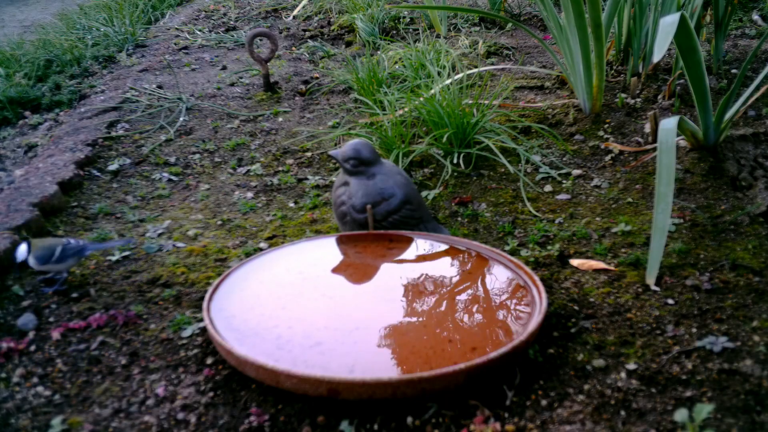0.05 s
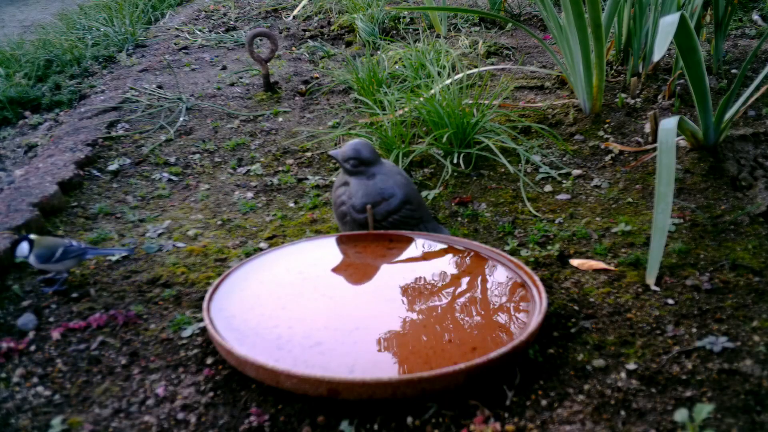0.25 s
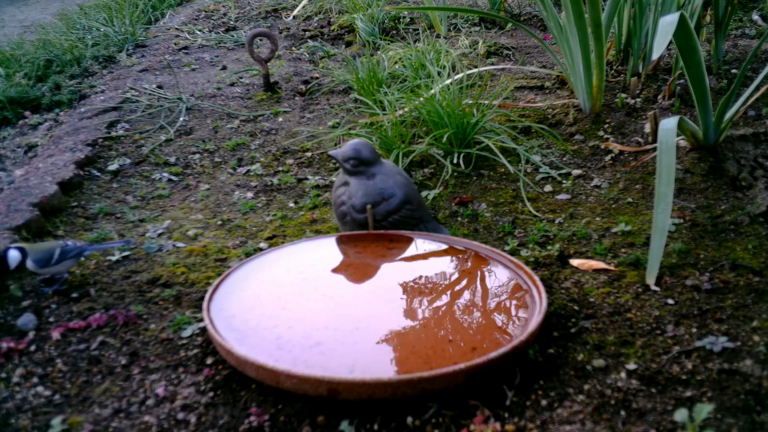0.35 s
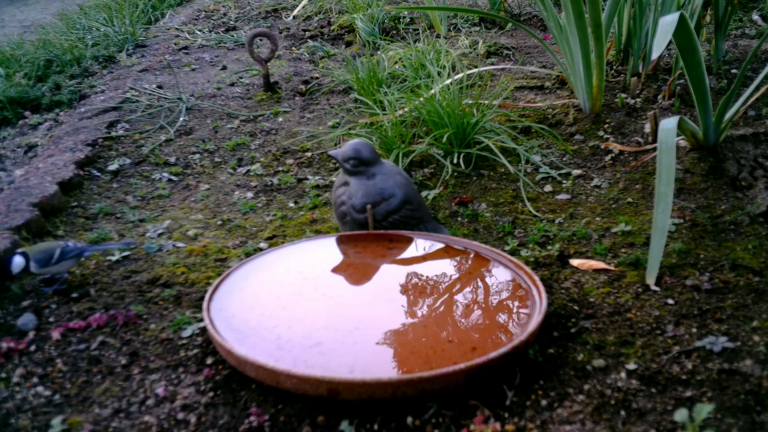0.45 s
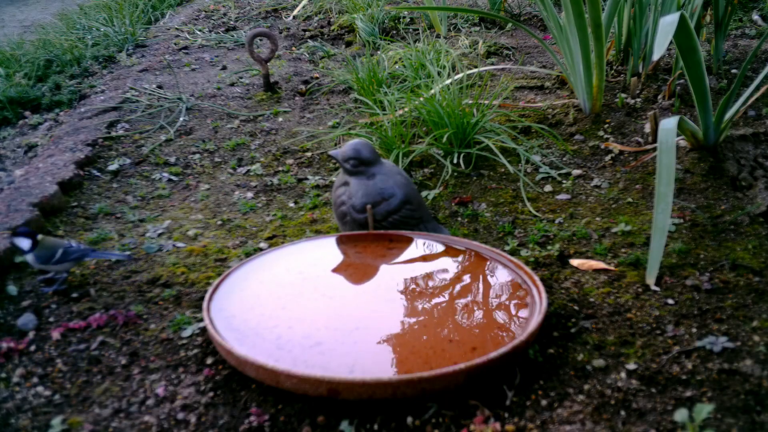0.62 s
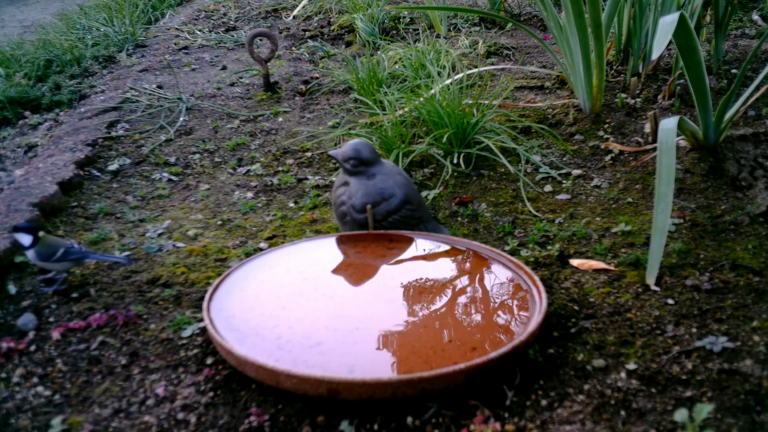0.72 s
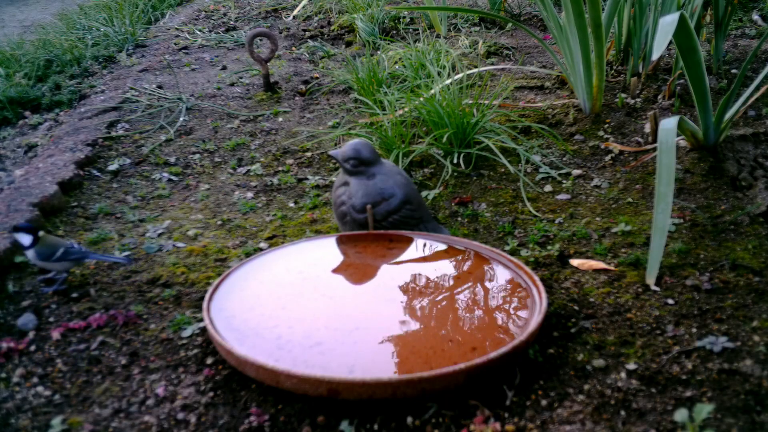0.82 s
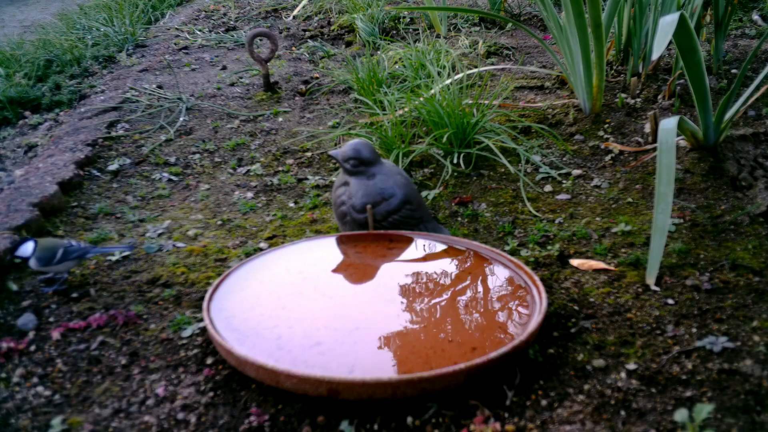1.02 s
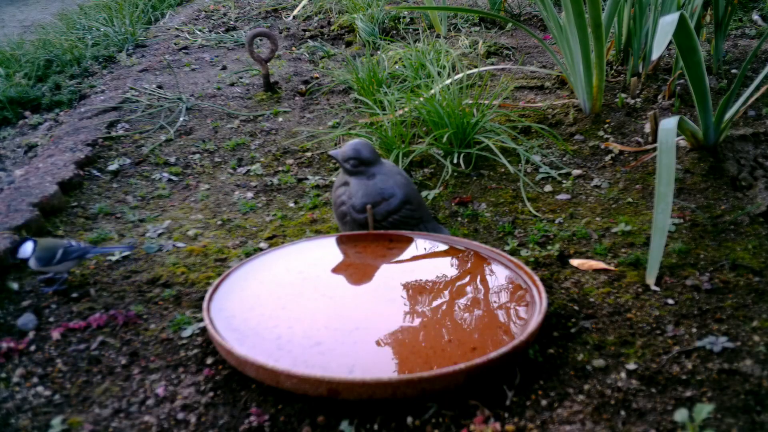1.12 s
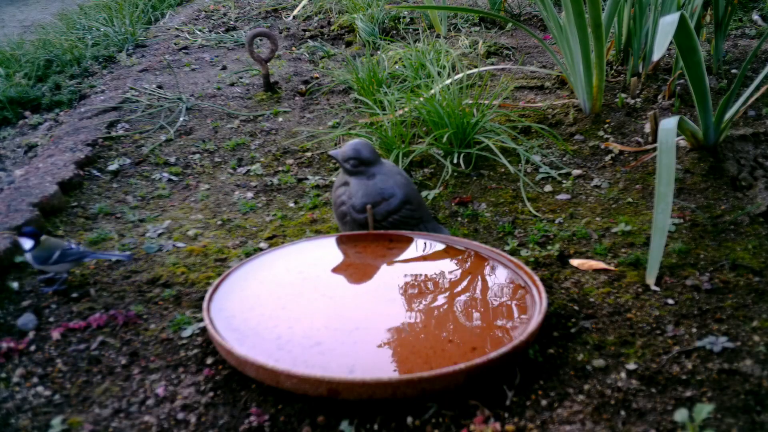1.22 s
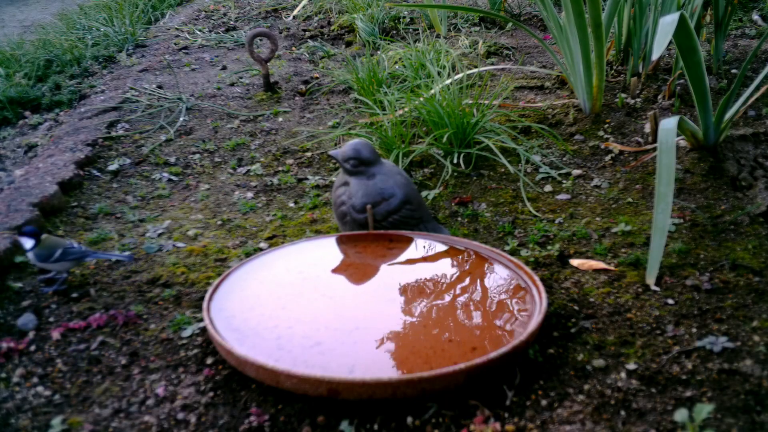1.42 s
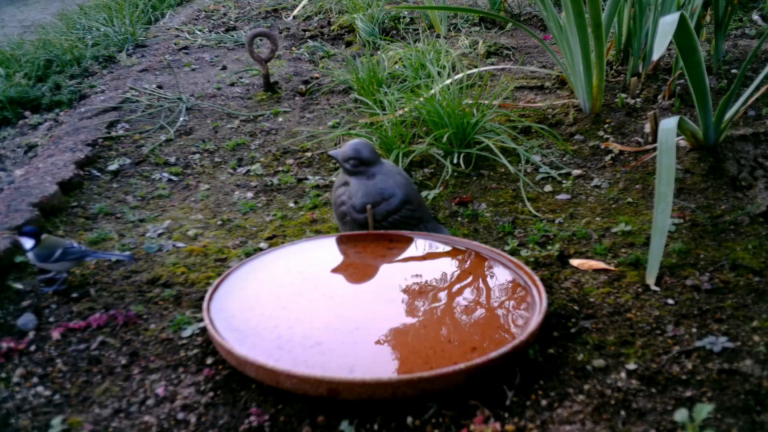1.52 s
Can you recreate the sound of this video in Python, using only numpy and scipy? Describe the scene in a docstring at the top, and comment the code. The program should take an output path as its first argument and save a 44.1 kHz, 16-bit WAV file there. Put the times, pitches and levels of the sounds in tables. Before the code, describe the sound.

Soft rustling and scuffing come from a small bird foraging on nearby garden soil, broken by two clusters of tiny, sharp snaps. Faint chirps sound before and after them, over an outdoor hush and low microphone rumble.

```python
"""In a garden, a small bird shuffles and pecks in dry litter a metre or two away.
Bits of twig and husk snap, feet scuff the soil, and fine crackle runs between the moves.
Other birds whistle a few faint chirps over a quiet outdoor hush.
Low buffeting rumbles on the microphone."""
import sys
import numpy as np
from scipy import signal
from scipy.fft import rfft, irfft
from scipy.io import wavfile
from scipy.ndimage import uniform_filter1d

SR = 44100
rng = np.random.default_rng(int(sys.argv[2]) if len(sys.argv) > 2 else 0)


def wrap_up_sound(samples):
    """Save the sound to the file named by the first command line argument, as 16-bit audio."""
    columns = np.atleast_2d(samples).T
    # keep every value between -1 and 1, then stretch to whole-number steps
    tamed = np.clip(columns, -1, 1)
    steps = np.round(tamed * 32767).astype(np.int16)
    wavfile.write(sys.argv[1], SR, steps)


N = 68355
T = np.arange(N) / SR

# dry crackle spectrum: freq_hz, gain_db
LITTER_SPECTRUM = [(300, 4), (900, 0.5), (2000, -0.5), (4000, -0.5), (6000, -2), (8000, -5), (11000, -4.5),
                   (15500, -8)]


def snaps(rise_s=0.000075, settle_db=-23, settle_s=0.006):
    """Each fracture is a spike and a short burst that ring a fragment and stems; litter then settles."""
    # start_s, level_db, centre_hz, width_hz, decay_s, crack_db (re fragment)
    fractures = [(0.44, -45, 3540, 1200, 0.0015, 8), (0.4448, -39.5, 3540, 500, 0.0007, 7),
                 (0.45, -40, 3470, 500, 0.00075, 14), (0.4725, -37.5, 9200, 5000, 0.00047, -3),
                 (0.481, -26.5, 6800, 5240, 0.00069, 21), (0.4834, -32, 3550, 446, 0.00059, 11),
                 (0.695, -44, 4380, 3180, 0.0013, -10), (0.8266, -47.5, 1730, 2520, 0.0078, -3),
                 (0.9333, -37, 2860, 2630, 0.0021, -21), (.9516, -41.5, 5230, 2200, 0.0023, -2),
                 (0.9935, -20, 5050, 3200, 0.00029, 2), (0.9944, -30.5, 5600, 2800, 0.0025, -24),
                 (1.0001, -27, 5650, 3360, 0.00068, -14), (1.0232, -43, 1890, 2000, 0.0016, 18),
                 (1.2047, -42.5, 1420, 457, 0.0034, -23), (1.3071, -44, 3100, 1400, 0.0039, 9)]
    # freq_hz, width_hz, gain_db (re fragment)
    stem_modes = [(3670, 200, -17), (5200, 140, -20), (6130, 210, -19), (7250, 450, -17)]
    # thin, bright crack: freq_hz, gain_db
    crack_spectrum = [(400, -28), (1200, -9.5), (3300, 0.5), (9500, 2), (15000, -5.5)]
    out = np.zeros(N)
    for start_s, level_db, centre_hz, width_hz, decay_s, crack_db in fractures:
        age_s = np.maximum(T - start_s, 0)
        attack = 1 - np.exp(-age_s / rise_s)
        settling = undb(settle_db) * np.exp(-age_s / settle_s)
        burst = attack * (np.exp(-age_s / decay_s) + settling) * np.sign(rng.standard_normal(N))
        burst[int(start_s * SR)] += 2.46  # first spike
        fragment = ring(ring(burst, centre_hz, width_hz), centre_hz, 2 * width_hz)
        stems = sum(undb(db) * ring(burst, hz, band_hz) for hz, band_hz, db in stem_modes)
        crack = undb(crack_db) * colour(burst, crack_spectrum)
        burst_rms = np.sqrt(np.mean(burst ** 2))
        out += undb(level_db) * burst_rms * unit(fragment + stems + crack)
    return out


def scuffs(rise_share=0.32):
    """Short scuffs of crackle with a resonant body, plus one longer low swell of microphone buffeting."""
    # start_s, length_s, crackle_db, body_db, body_hz
    swells = [(0.013, 0.014, -54, -54, 800), (0.024, 0.014, -61, -53, 3460), (0.312, 0.02, -59, -56, 1400),
              (0.338, 0.024, -55, -77, 4200), (0.383, 0.013, -53.5, -59, 4800),
              (.404, 0.0073, -49.5, -72, 4030), (0.44, 0.015, -47, -59, 3330),
              (0.754, 0.028, -53, -59, 2740), (0.792, 0.015, -55, -48.5, 2030),
              (0.821, 0.014, -58, -45.5, 418), (0.91, 0.019, -54, -62, 2100),
              (0.947, 0.011, -51, -50.5, 920), (0.983, 0.025, -50, -54, 1080),
              (1.011, 0.017, -46.5, -43, 4450), (1.018, 0.0043, -65, -63, 1000),
              (1.07, 0.019, -49, -49, 8950), (1.099, 0.13, -67, -54.5, 230),
              (1.155, 0.035, -57, -58.5, 1800), (1.199, 0.0098, -66, -53, 1270),
              (1.206, 0.018, -47.5, -68, 3900), (1.278, 0.0075, -52, -58, 7000),
              (1.31, 0.0041, -45.5, -55, 5600), (1.332, 0.013, -54, -60, 3200)]
    out = np.zeros(N)
    for start_s, length_s, crackle_db, body_db, body_hz in swells:
        rise = np.maximum(T - start_s, 0) / (length_s * rise_share)
        envelope = rise * np.exp(1 - rise)
        body = undb(body_db) * ring(grains(), body_hz, width_hz=0.6 * body_hz)
        crackle = undb(crackle_db) * colour(grains(), LITTER_SPECTRUM)
        out += envelope * (crackle + body)
    return out


def rustle():
    """Fine litter crackle that follows the bird's activity."""
    # time_s, level_db
    activity = [(0, -54), (.06, -61.5), (.26, -61), (.33, -55.5), (.42, -57.5), (.49, -56), (.54, -59.5),
                (.73, -60), (.80, -58.5), (.87, -55), (.945, -47.5), (.975, -53.5), (1.02, -48),
                (1.06, -53.5), (1.14, -57), (1.23, -57), (1.33, -57), (1.39, -60.5)]
    return colour(grains(), LITTER_SPECTRUM) * curve(activity)


def chirps():
    """Other birds: near-pure whistles that bend through three pitches as they swell and fade."""
    # start_s, length_s, start_hz, mid_hz, end_hz, level_db, crest_share (of length)
    calls = [(0.026, 0.017, 4170, 3980, 3600, -55.5, 0.1), (0.224, 0.018, 4250, 4740, 4630, -42.5, 0.7),
             (0.24, 0.0086, 4600, 4420, 4260, -45, 0.44), (1.095, 0.018, 2600, 2535, 2530, -51, 0.5),
             (1.179, 0.022, 4810, 4447, 4200, -40, 1), (1.263, 0.015, 4300, 4200, 4130, -46, 0.27),
             (1.295, 0.035, 3200, 3330, 3200, -57, 0.6)]
    out = np.zeros(N)
    for start_s, length_s, start_hz, mid_hz, end_hz, level_db, crest_share in calls:
        progress = np.clip((T - start_s) / length_s, 0, 1)
        bend = np.polyfit([0, 0.5, 1], [start_hz, mid_hz, end_hz], 2)
        pitch_hz = np.polyval(bend, progress)
        triangle = np.interp(progress, [0, np.clip(crest_share, 0.1, 0.9), 1], [0, 1, 0])
        swell = np.sin(np.pi / 2 * triangle) ** 1.87
        tone = np.sqrt(2) * np.sin(2 * np.pi * np.cumsum(pitch_hz) / SR)
        out += undb(level_db) * swell * tone
    return out


def buffeting(gain_db=1.5, bump_rise_s=0.008):
    """Slow pressure swings on the microphone, with a few dull bumps."""
    # freq_hz, gain_db
    swing_spectrum = [(5, -2), (11, 13), (25, 3.5), (42, -9.5), (62, -13), (85, -27.5), (130, -31),
                      (220, -70)]
    # time_s, relative_db
    surges = [(0, -38), (.08, -37.5), (.17, -30.5), (.23, -24.5), (.29, -15.5), (.345, -27), (.40, -23.5),
              (.46, -19.5), (.53, -23), (.59, -33), (.74, -47.5), (.83, -27.5), (.90, -39.5), (1.08, -37.5),
              (1.15, -16.5), (1.23, -33.5), (1.35, -34.5), (1.41, -35), (1.55, -46.5)]
    # start_s, level_db, pitch_hz, decay_s
    bumps = [(0.21, -12, 24.6, 0.031), (0.264, -5.5, 26.64, 0.029), (.372, -11, 51.7, 0.023),
             (0.436, -9, 40.4, 0.018), (0.789, -5, 31.2, 0.0068), (0.824, -11.5, 83, 0.0048),
             (0.977, -23.5, 73, .012)]
    swing = signal.hilbert(colour(rng.standard_normal(N), swing_spectrum))
    local_level = np.sqrt(uniform_filter1d(np.abs(swing) ** 2, size=3000))
    steady_rumble = colour(swing.real / local_level, [(100, 8), (200, -60), (400, -48)])
    out = steady_rumble * curve(surges) * undb(gain_db)
    for start_s, level_db, pitch_hz, decay_s in bumps:
        age_s = np.maximum(T - start_s, 0)
        envelope = np.exp(-age_s / decay_s) * (1 - np.exp(-age_s / bump_rise_s))
        out += undb(level_db) * envelope * np.sin(2 * np.pi * pitch_hz * age_s)
    return out


def hush(level_db=-40):
    """Steady outdoor air."""
    # freq_hz, gain_db
    air_spectrum = [(25, 1), (60, -7.5), (100, -12), (140, -11.5), (190, -23), (235, -19.5), (320, -28),
                    (480, -31), (650, -35.5), (1000, -34.5), (2500, -43.5), (4500, -56.5), (8000, -56),
                    (15500, -60)]
    return colour(rng.standard_normal(N), air_spectrum) * undb(level_db)


def garden_echo(x, wet_db, t60_s=0.15, blur_hz=132):
    """Add a short, diffuse scatter from plants and walls."""
    envelope = np.exp(-np.log(1000) * T / t60_s) * (1 - np.exp(-T / 0.002))
    tail = colour(rng.standard_normal(N), LITTER_SPECTRUM) * envelope
    echo = signal.fftconvolve(x, tail / np.sqrt(np.sum(tail ** 2)))[:N]
    lowpass = signal.butter(2, blur_hz, fs=SR, output="sos")
    blur = unit(signal.sosfilt(lowpass, rng.standard_normal(N)))  # smears pure pitches
    return x + undb(wet_db) * blur * echo


def grains(rate_per_s=6800, spread_db=0.5, max_db=8):
    """Dense tiny clicks of uneven size; rms 1."""
    hits = rng.random(N) < rate_per_s / SR
    size_db = np.minimum(spread_db * rng.exponential(size=N), max_db)
    return unit(hits * np.sign(rng.standard_normal(N)) * undb(size_db))


def ring(x, centre_hz, width_hz):
    """One two-pole resonance; rms 1."""
    warp = np.tan(np.pi * min(centre_hz, 0.45 * SR) / SR)
    damping = warp * abs(width_hz / centre_hz)
    feedback = [1 + damping + warp ** 2, 2 * (warp ** 2 - 1), 1 - damping + warp ** 2]
    return unit(signal.lfilter([1, 0, -1], feedback, x))


def colour(x, points):
    """Filter by (freq_hz, gain_db) points; rms 1."""
    freq_hz, gain_db = np.array(points).T
    bins_hz = np.maximum(np.arange(N // 2 + 1) * SR / N, 1)
    gain = undb(np.interp(np.log(bins_hz), np.log(freq_hz), gain_db))
    return unit(irfft(rfft(x) * gain, N))


def curve(points):
    """Gain from (time_s, level_db) points."""
    return undb(np.interp(T, *np.array(points).T))


def undb(db):
    """Decibels to gain."""
    return 10 ** (np.asarray(db) / 20)


def unit(x):
    """Scale to rms 1."""
    return x / np.sqrt(np.mean(x ** 2) + 1e-20)


def scene():
    """Air, foraging bird and its neighbours; mono."""
    air = hush() + buffeting()
    litter = garden_echo(rustle() + scuffs() + snaps(), wet_db=-18)
    neighbours = garden_echo(chirps(), wet_db=-13.5)
    return (air + litter + neighbours)[None]


def record(dry):
    """Steep low-pass on the top treble."""
    cutoff_hz = 15600
    return signal.sosfilt(signal.ellip(8, 0.2, 70, cutoff_hz, fs=SR, output="sos"), dry)


dry = scene()
out = record(dry)
wrap_up_sound(out)
```